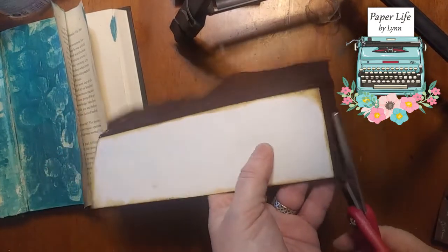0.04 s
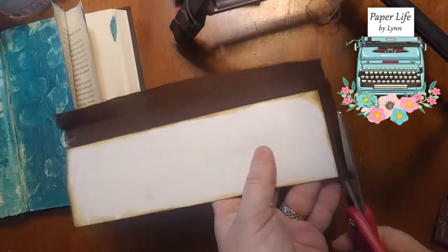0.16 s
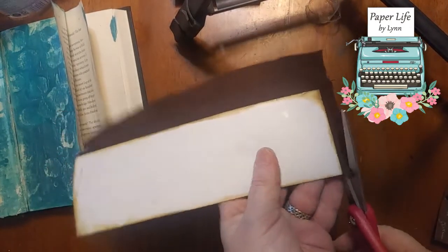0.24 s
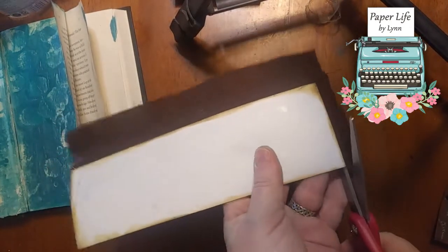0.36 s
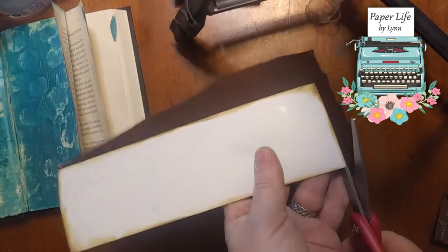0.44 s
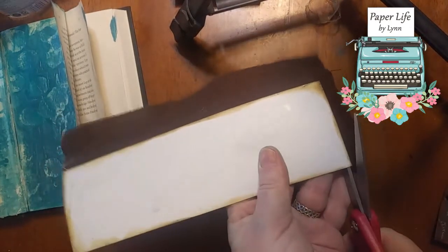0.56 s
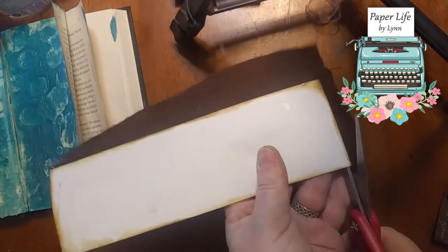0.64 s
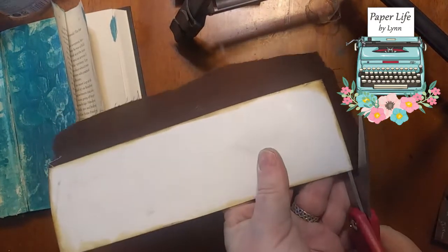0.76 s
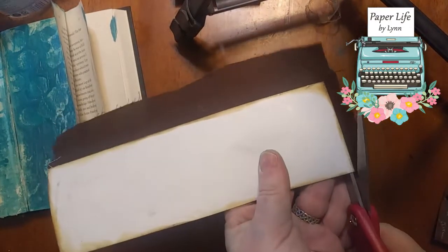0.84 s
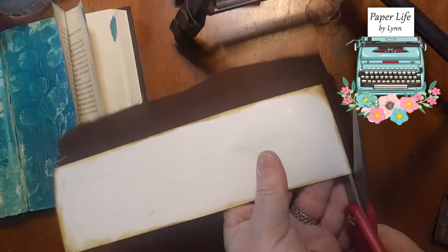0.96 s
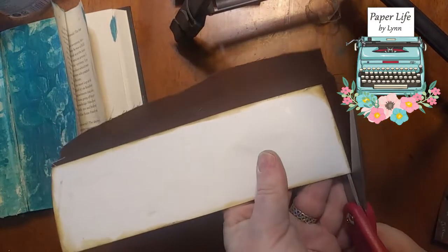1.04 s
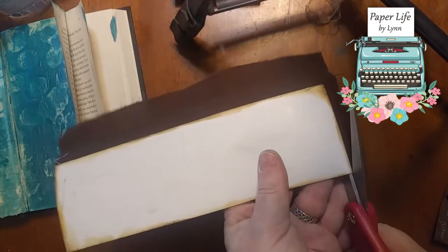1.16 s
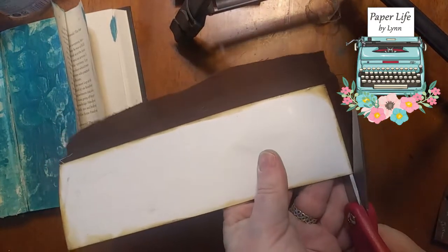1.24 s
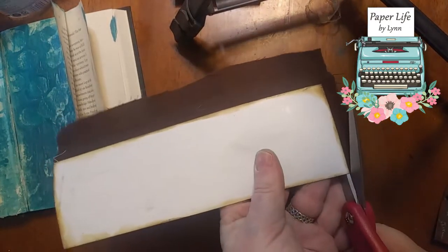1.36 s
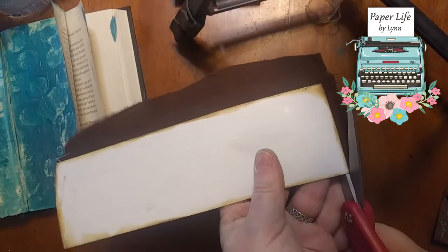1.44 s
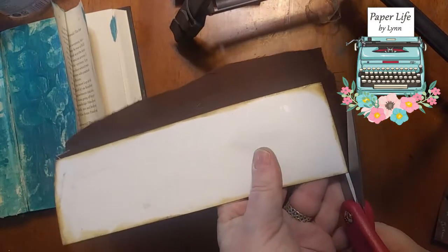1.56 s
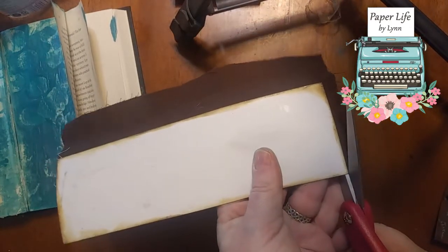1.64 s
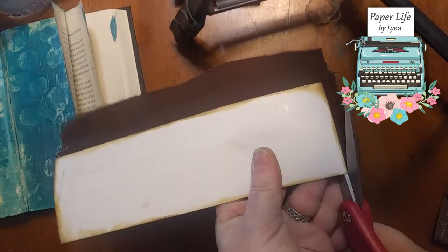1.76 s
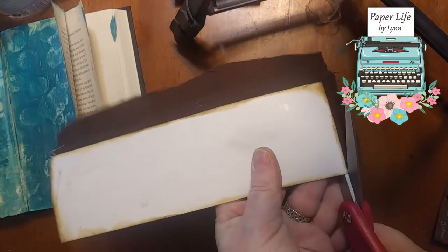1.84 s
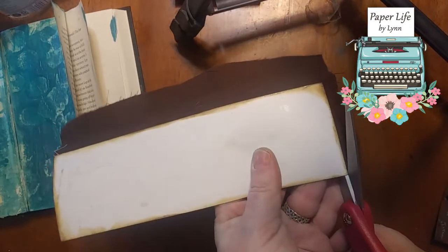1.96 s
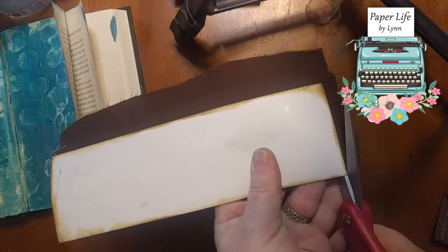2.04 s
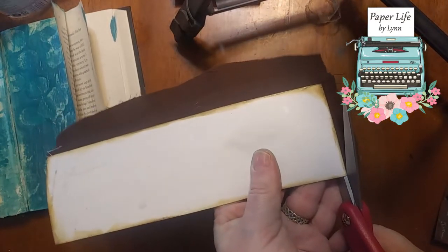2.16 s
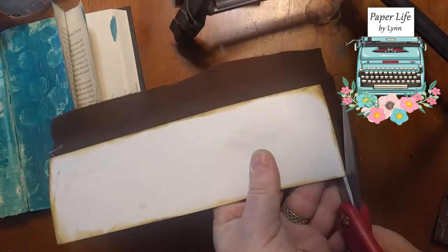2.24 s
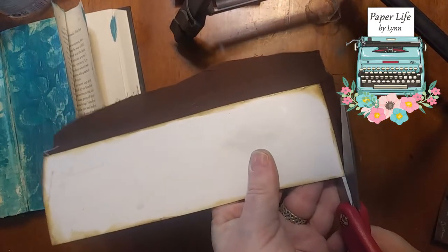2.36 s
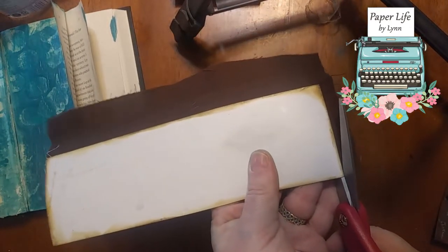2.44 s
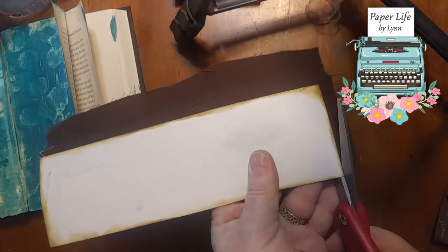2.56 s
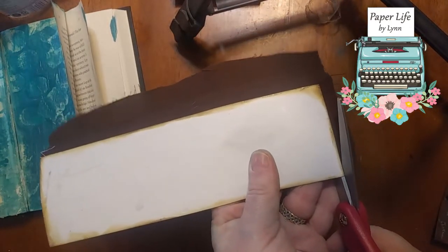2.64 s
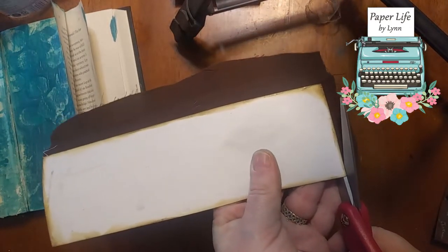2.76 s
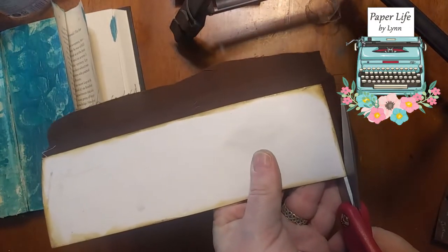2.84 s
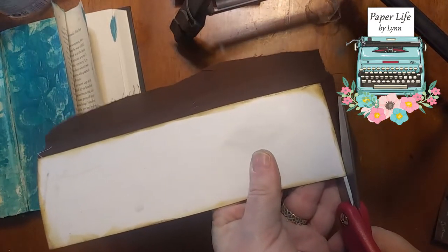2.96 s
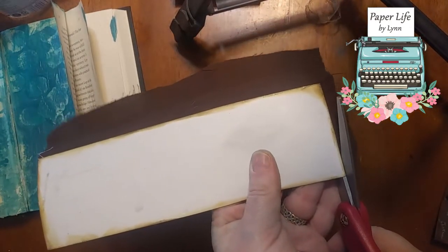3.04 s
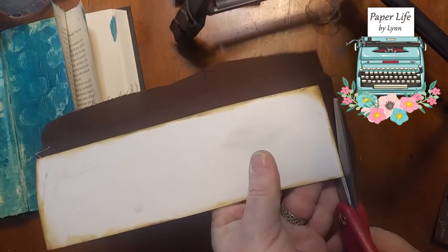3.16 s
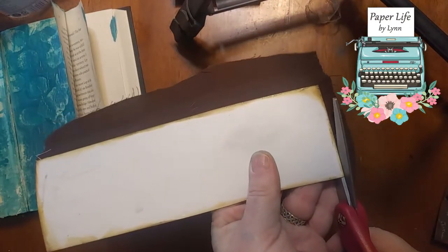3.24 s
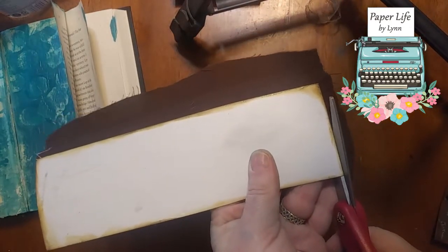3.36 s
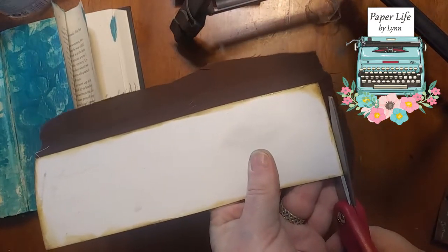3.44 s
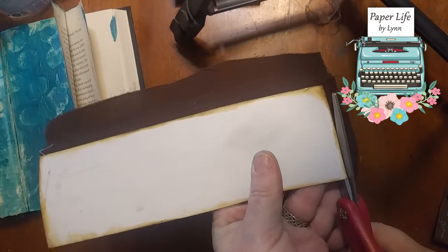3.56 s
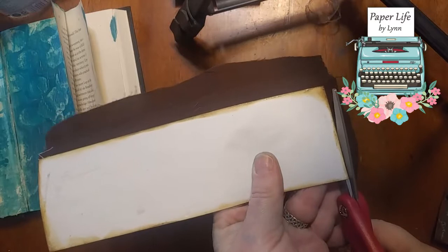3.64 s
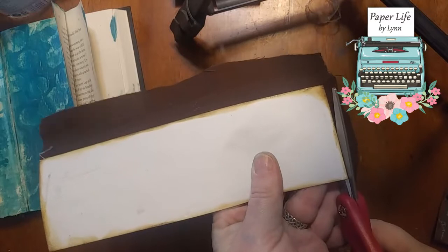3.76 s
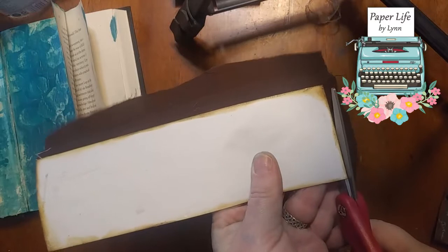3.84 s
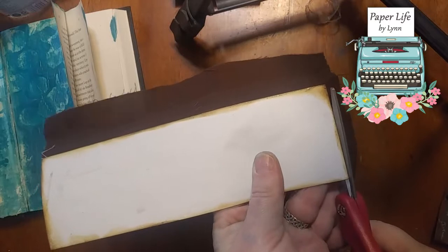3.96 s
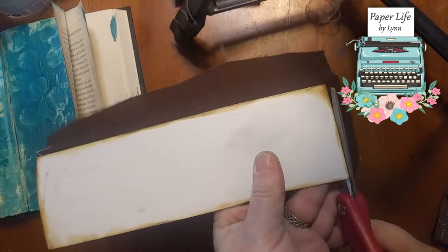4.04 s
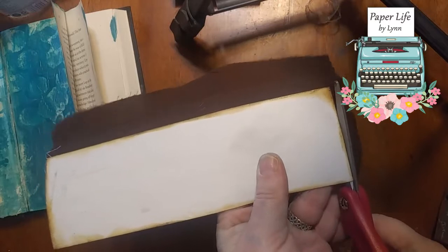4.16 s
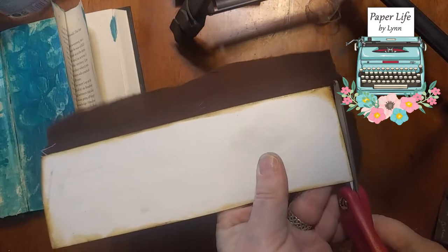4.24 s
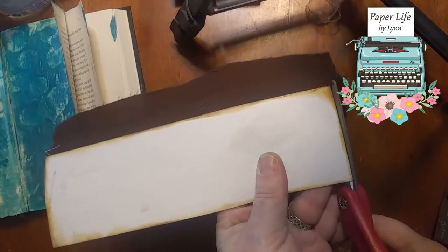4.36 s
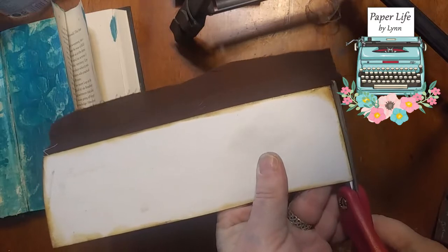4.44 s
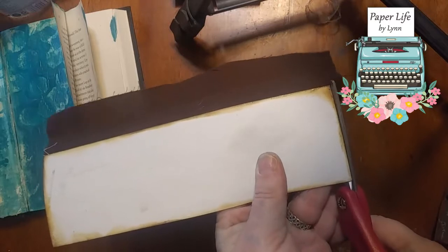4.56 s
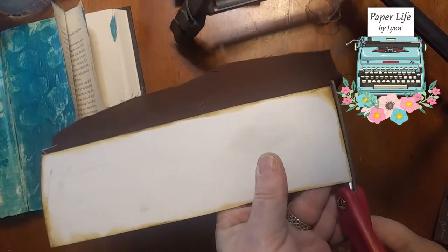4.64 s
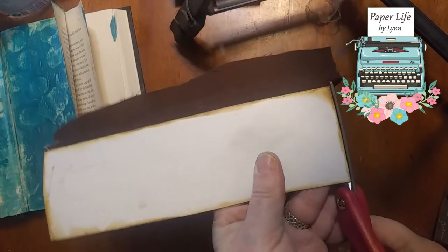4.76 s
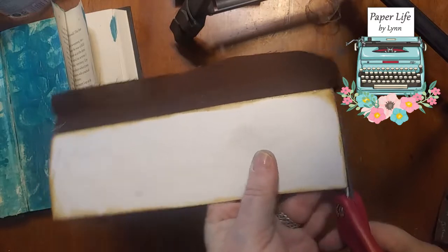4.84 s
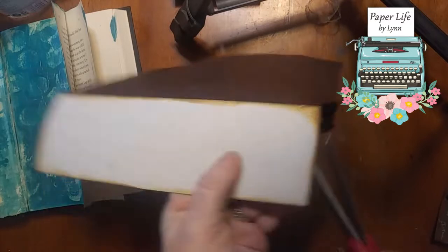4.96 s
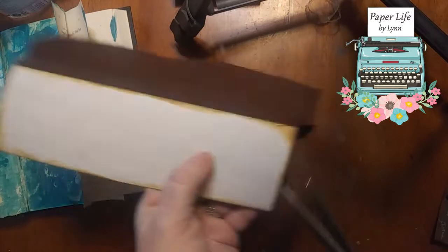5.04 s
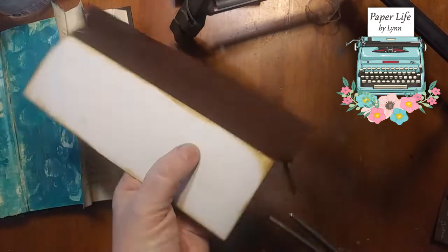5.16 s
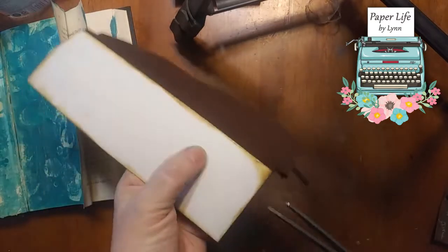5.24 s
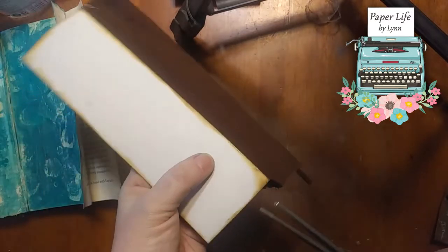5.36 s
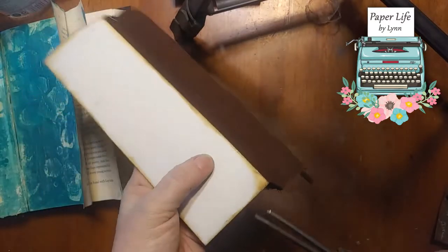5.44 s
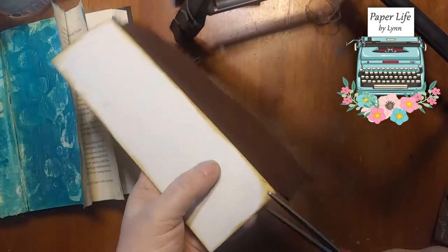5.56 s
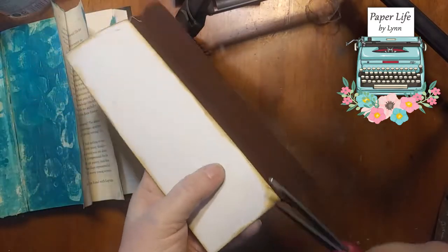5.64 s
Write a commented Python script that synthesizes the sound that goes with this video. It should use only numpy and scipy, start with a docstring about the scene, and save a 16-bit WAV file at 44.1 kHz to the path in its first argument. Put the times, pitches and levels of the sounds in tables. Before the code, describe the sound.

In a quiet room with a faint unsteady motor hum, fabric and card rustle briefly in the hand. Scissor blades then creep almost silently with tiny thin slips. Short metallic scrapes grow firmer, with clicks and pauses, until a sharp crack, a tight run of snips and a hard snap shut. A few knocks and papery rustles follow. Close microphone, small dry indoor space.

```python
"""Steel scissors trim thin fabric along a hand-held card, close by in a quiet room with a faint, steady hum.
Fabric rustles and a few slips zing; the blades creep and inch forward with faint slips and longer glides.
Then they bite in short stick-slip strokes, knock against the card, break through with a crack and snap shut.
Last come a few knocks, and fabric and card rustle as they are lifted and turned.
Friction is coloured grains, knocks are clicks ringing damped modes, the hum is sines over coloured noise."""
import sys
import numpy as np
from scipy import signal
from scipy.fft import rfft, irfft
from scipy.io import wavfile

SR = 44100
rng = np.random.default_rng(int(sys.argv[2]) if len(sys.argv) > 2 else 0)


def generate_wav(signal):
    """Clip the signal to [-1, 1] and save it as 16-bit WAV at the path in sys.argv[1]."""
    frames = np.transpose(np.atleast_2d(signal))
    scaled = np.clip(frames, -1, 1) * 32767
    pcm = np.round(scaled).astype(np.int16)
    wavfile.write(sys.argv[1], SR, pcm)


N = 251370
TIME = np.arange(N) / SR

# blades creeping between the slips, before the trim in creep(): (t/s, level/dB)
CREEP_LEVEL = [(0.42, -62), (1.13, -70.5), (2.22, -78), (2.55, -69.5), (3.08, -71.5), (3.47, -66),
               (3.66, -64.5), (3.91, -82), (4.23, -66), (4.34, -62), (4.47, -56), (4.85, -61)]


def from_db(db):
    """Decibels to gain."""
    return 10 ** (np.asarray(db) / 20)


def rms_one(x):
    """Scale to unit power."""
    return x / np.sqrt(np.mean(x ** 2) + 1e-20)


def coloured(x, spectrum):
    """Filter x by a curve drawn on a log-frequency axis; rms 1."""
    hz, db = np.transpose(spectrum)
    bins = np.maximum(np.fft.rfftfreq(N, 1 / SR), 1)
    gain = from_db(np.interp(np.log(bins), np.log(hz), db))
    return rms_one(irfft(rfft(x) * gain, N))


def drift(per_s):
    """Slow random curve of rms 1 through per_s new points a second."""
    knots = rng.standard_normal(N // 10)
    return rms_one(np.interp(TIME * per_s, np.arange(len(knots)), knots))


def grains(per_s, spread_db, clump_db, clumps_per_s):
    """Tiny friction releases of uneven size, whose strength drifts so that they clump."""
    born = rng.random(N) < per_s / SR
    size_db = spread_db * np.minimum(rng.exponential(1, N), 4) + clump_db * drift(clumps_per_s)
    return born * rng.choice([-1, 1], N) * from_db(size_db)


def ring(x, hz, t60):
    """A damped two-pole mode: a unit click sets a sine of height 1 ringing."""
    radius = from_db(-60 / (t60 * SR))
    angle = 2 * np.pi * hz / SR
    feedback = [1, -2 * radius * np.cos(angle), radius ** 2]
    return signal.lfilter([0, np.sin(angle)], feedback, x + 1e-18)


def level(rows):
    """A dB curve as a gain, silent outside its span."""
    s, db = np.transpose(rows)
    return from_db(np.interp(TIME, s, db, left=-150, right=-150))


def add(out, s, sound):
    """Mix a sound in at time s."""
    start = max(round(s * SR), 0)
    out[start:start + len(sound)] += sound[:N - start]


def motion(start, length, attack, release):
    """Gain of a hand movement: a smooth rise around its start, a hold, an exponential release."""
    rise = 0.5 + 0.5 * np.tanh(2 * (TIME - start) / attack)
    return rise * np.exp(-np.maximum(TIME - start - length, 0) / release)


def focused(x, hz, q, share):
    """Let one resonance stand out of x; rms 1."""
    resonance = signal.lfilter(*signal.iirpeak(hz, q, fs=SR), x)
    return rms_one(x + share * rms_one(resonance))


def radiated(x):
    """Such small objects radiate little bass."""
    return signal.sosfilt(signal.butter(2, 220, "high", fs=SR, output="sos"), x)


def tone(hz, wander_rad=0.2):
    """A sine of rms 1 whose phase wanders a little."""
    start_turn = rng.random()
    return np.sqrt(2) * np.sin(2 * np.pi * (hz * TIME + start_turn) + wander_rad * drift(3.03))


def background():
    """Soft air noise under slightly unsteady appliance tones, with a throbbing mains tone and a swelling motor tone."""
    # the room's steady air, relative: (f/Hz, level/dB per Hz)
    air_colour = [(18, -52), (36, -18), (62, -13.5), (105, -13), (140, -8.5), (175, -0.5), (230, -2),
                  (275, -6.5), (374, -5.5), (426, -3.5), (584, -16.5), (1010, -14), (1100, -18.5),
                  (2010, -22), (7470, -34), (9220, -35), (12000, -42), (16000, -36.5)]
    # an appliance's hum, before its waver: (f/Hz, level/dB rms)
    hum_tones = [(59.4, -77), (158.2, -67), (237.6, -67), (240.0, -65), (252.1, -66), (297.0, -61),
                 (336.1, -68), (356.4, -65.5), (360.0, -68), (415.8, -62.5), (475.2, -67), (534.6, -74),
                 (653.4, -78), (772.2, -75), (831.6, -75), (1009.8, -76), (1188.0, -77), (1960.2, -78),
                 (2376.0, -80)]
    # the strongest motor tone swells and fades: (t/s, level/dB rms)
    drone_level = [(0, -62.5), (0.4, -56.5), (0.65, -63), (1.1, -56), (1.35, -61), (1.62, -54.5),
                   (2.0, -65.5), (2.42, -53.5), (2.7, -71), (3.3, -58.5), (3.9, -55.5), (4.55, -65.5),
                   (5.15, -52), (5.5, -64), (5.7, -61)]
    air_db, waver_db = -54.5, 1.5
    mains_hz, mains_db, drone_hz = 120.0, -60, 210.8
    # the mains tone throbs slowly, as a motor's slip beats against it
    throb_depth, throb_period_s, throb_peak_s = 0.29, 0.571, 0.3

    hum = sum(from_db(db + waver_db * drift(5.4)) * tone(hz) for hz, db in hum_tones)
    throb = 1 + throb_depth * np.cos(2 * np.pi * (TIME - throb_peak_s) / throb_period_s)
    hum += from_db(mains_db) * throb * tone(mains_hz)
    hum += level(drone_level) * tone(drone_hz)
    return hum + from_db(air_db) * coloured(rng.standard_normal(N), air_colour)


def creep(trim_db=-3.0):
    """The slowly closing edges whisper against each other: dense, clumping friction grains."""
    # colour of the whisper, relative: (f/Hz, level/dB)
    creep_colour = [(500, -39), (2500, -13.5), (4200, -11), (6600, -15.5), (7700, -25), (8700, -4),
                    (9600, -5), (10700, -25), (12000, -23), (16000, -34)]
    friction = grains(per_s=9000, spread_db=2.5, clump_db=2.5, clumps_per_s=70)
    return from_db(trim_db) * level(CREEP_LEVEL) * coloured(friction, creep_colour)


def rustle(trim_db=1.5, fold_q=4, snag_share=0.38):
    """Fibres flick, each at its own pitch, with coarser snags; the bent sheet adds a resonance."""
    # colour of fabric friction, relative: (f/Hz, level/dB)
    rustle_colour = [(410, 12), (700, 6.5), (971, 5.5), (1090, -13), (1300, 7.5), (1940, -5), (3030, 1.5),
                     (3280, -1), (3550, -0.5), (6400, 1), (6830, -4.5), (9230, 9), (11800, -11.5),
                     (16000, -12)]
    # sweeps of fabric over card and fingers, before the trim:
    # (start t/s, length/s, level/dB, bent sheet f/Hz, share of that resonance)
    sweep_rows = [(0.0, 0.1, -54.5, 4000, 0.22), (0.167, 0.029, -49.5, 2000, 0.31),
                  (0.256, 0.093, -51, 1920, 0.27), (0.37, 0.034, -59, 4200, 0.19),
                  (0.5, 0.035, -60, 2200, .6), (0.872, 0.029, -64, 1900, 0.44), (1.202, 0.18, -69, 2080, 3),
                  (4.849, 0.071, -54, 3330, 0.18), (4.95, 0.081, -47.5, 3400, .25),
                  (5.068, 0.06, -52.5, 3600, .2), (5.169, 0.17, -55, 4680, 0.43),
                  (5.432, 0.095, -56.5, 3300, .2), (5.654, .035, -63.5, 4500, 0.22)]
    # a sweep swells, eases off as the hand slows, and dies away
    attack_s, sag_db_per_s, release_s = 0.014, 6, 0.024

    flicks = np.zeros(N)
    for hz in np.linspace(1000, 15000, 10):
        fibres = grains(per_s=1400, spread_db=2.8, clump_db=2.5, clumps_per_s=140)
        flicks += signal.lfilter(*signal.iirpeak(hz, hz / 1500, fs=SR), fibres)
    snags = grains(per_s=260, spread_db=2.4, clump_db=2.0, clumps_per_s=40)
    friction = coloured(rms_one(flicks) + snag_share * rms_one(snags), rustle_colour)
    out = np.zeros(N)
    for s, length, db, fold_hz, share in sweep_rows:
        sagging_db = db - sag_db_per_s * np.clip(TIME - s, 0, length)
        hand = from_db(sagging_db) * motion(s, length, attack_s, release_s)
        out += hand * focused(friction, fold_hz, fold_q, share)
    return from_db(trim_db) * out


def knocks(thump_t60=0.02):
    """A crunchy click rings the scissors, whose modes shift with how far the blades are open, and thumps the card."""
    # blades catching or meeting:
    # (t/s, ring level/dB, contact hardness f/Hz, main mode f/Hz, card thump level/dB, thump f/Hz)
    knock_rows = [(0.0742, -45, 14000, 1150, -31, 424), (0.804, -50.5, 5000, 1150, -60, 600),
                  (2.956, -33.5, 1500, 1194, -39, 520), (3.3874, -23, 950, 1150, -29.5, 587),
                  (3.437, -25.5, 1150, 1175, -32, 625), (3.9205, -39, 4000, 1230, -34, 500),
                  (3.9258, -16.5, 1000, 1225, -32.5, 500), (3.950, -30, 1300, 1230, -43, 415),
                  (3.9666, -33.5, 2500, 1230, -33, 413), (3.975, -39, 2500, 1245, -42, 448),
                  (4.288, -27.5, 6000, 1150, -49, 422), (4.2941, -18, 12000, 1150, -38, 495),
                  (4.3153, -44, 8000, 1150, -51, 513), (4.383, -45, 8000, 1150, -38, 566),
                  (4.538, -39, 9000, 1190, -43, 418), (4.647, -38.5, 4000, 1250, -32.5, 834),
                  (4.8497, -19.5, 910, 1225, -27, 545), (4.861, -29, 1800, 1260, -27.5, 428),
                  (4.938, -46, 1500, 1150, -36, 405), (4.974, -51, 1500, 1150, -30, 560),
                  (4.98, -50, 2500, 1150, -43, 630), (4.985, -37, 2000, 1150, -39, 574)]
    # modes of the scissors, damped by the hand, before the shift: (f/Hz, level/dB, t60/s)
    hand_damped_modes = [(834, -32, 0.067), (1150, -4.5, 0.032), (1430, -4.5, 0.0094), (1800, -10, 0.028),
                         (2450, -9.5, 0.028), (3250, 1, 0.0079), (3600, -0.5, 0.011), (4120, 0, 0.016),
                         (4400, 3.5, 0.0078), (5000, -24, .018), (6630, -5, .016), (6330, -11, .012),
                         (8600, -8, .013)]
    # the blades' faint after-ring, before the shift: (f/Hz, level/dB, t60/s)
    after_ring = [(1150, -30.5, 0.098), (2450, -30, 0.093), (3600, -37, 0.6), (3800, -36, 0.64),
                  (4080, -38, .1), (6300, -37, 0.19)]
    main_mode_hz, crunch_db, crunch_s = 1150, -29, 0.002

    out, t = np.zeros(N), TIME[:SR // 2]
    click = 1.0 * (t == 0)
    for s, ring_db, hard_hz, ring_hz, card_db, card_hz in knock_rows:
        crunch = from_db(crunch_db) * rng.standard_normal(len(t)) * np.exp(-t / crunch_s)
        # a softer contact passes less treble
        soft = np.exp(-2 * np.pi * hard_hz / SR)
        force = signal.lfilter([(1 - soft) ** 2], [1, -2 * soft, soft ** 2], click + crunch)
        opening = ring_hz / main_mode_hz
        steel = np.zeros(len(t))
        for k, (hz, mode_db, t60) in enumerate(hand_damped_modes + after_ring):
            steel += (-1) ** k * from_db(mode_db) * ring(force, hz * opening, t60)
        add(out, s, from_db(ring_db) * steel)
        add(out, s, from_db(card_db) * ring(click, card_hz, thump_t60))
    return radiated(out)


def snap(s, modes, contact_hz=11000, hollow_hz=8000, hollow_share=0.52):
    """One hard click rings the scissors briefly as one piece; the sound is hollow just under the zing."""
    click = 1.0 * (np.arange(N) == round(s * SR)) + 1e-18
    force = signal.sosfilt(signal.butter(3, contact_hz, fs=SR, output="sos"), click)
    force = force - hollow_share * signal.lfilter(*signal.iirpeak(hollow_hz, 6, fs=SR), force)
    return radiated(sum(from_db(db) * ring(force, hz, t60) for hz, db, t60 in modes))


def crack():
    """The blades break through a thick spot with one hard crack."""
    # modes of the crack: (f/Hz, level/dB, t60/s)
    crack_modes = [(560, -31, 0.018), (1304, -24, 0.016), (3150, -22.5, 0.0083), (3730, -17.5, 0.0083),
                   (4200, -24, .011), (7260, -29, .006), (9200, -26, .008)]
    return snap(4.2935, crack_modes)


def snap_shut():
    """The scissors close fully at the end of the cut and ring as a closed pair."""
    # modes of the closed pair: (f/Hz, level/dB, t60/s)
    shut_modes = [(356, -25.5, 0.02), (845, -35, 0.038), (1500, -33, .009), (2650, -47.5, 0.1),
                  (3000, -48, .05), (3300, -24, 0.0064), (4300, -25, 0.0068), (5050, -28, 0.0088),
                  (7000, -33, .007), (9850, -43, .08)]
    return snap(4.747, shut_modes)


def blade_pitch(s):
    """Pitch of the zing at time s in Hz: it follows how hard the blades are pressed together."""
    # steel ring: (t/s, f/Hz)
    pitch_curve = [(0.0, 8900), (0.75, 8760), (2.36, 9200), (2.48, 9650), (3.09, 9300), (3.48, 9760),
                   (3.57, 8500), (3.79, 8850), (3.89, 10300), (4.06, 8900), (4.43, 8600), (4.76, 10100),
                   (4.89, 9000), (5.7, 9260)]
    return np.interp(s, *np.transpose(pitch_curve))


def shear(strokes, clump_db, tear_share):
    """The edges grind and ring near 9 kHz while threads part, in each stroke at a pitch of their own."""
    # colours of the steel zing, the top sizzle and the tearing threads, relative: (f/Hz, level/dB)
    zing_colour = [(5500, -47), (6900, -14.5), (7900, -21.5), (8800, -5.5), (9900, 3), (10500, -10.5),
                   (11500, -37), (13000, -30), (16000, -41)]
    sizzle_colour = [(9500, -4.5), (10700, 8.5), (11300, 2), (11800, -6), (12900, 1.5), (13700, -4),
                     (14500, -10), (16000, -6)]
    thread_colour = [(80, -49), (350, 2), (520, -3.5), (720, -1.5), (1230, -3), (1900, -3.5), (2450, -5.5),
                     (2820, -7), (3300, -2.5), (3750, -2.5), (4250, -1.5), (4600, -3), (5050, -1),
                     (5850, -6), (6700, 0.5), (7700, -14), (8700, -5), (11000, -13), (16000, -30)]
    # trims on the strokes' levels, and the zing's ring against its grind
    zing_trim_db, threads_trim_db, zing_share = 0.5, -0.56, 1.0
    zing_t60, tear_q = 0.003, 9

    grinding = grains(per_s=11000, spread_db=1.5, clump_db=clump_db, clumps_per_s=540)
    steel, sizzle = coloured(grinding, zing_colour), coloured(grinding, sizzle_colour)
    tearing = grains(per_s=7000, spread_db=2.4, clump_db=clump_db, clumps_per_s=400)
    cloth = coloured(tearing, thread_colour)
    out = np.zeros(N)
    for s, part, stroke, steel_db, cloth_db, tear_hz, top_db in strokes:
        ringing = ring(steel[part], blade_pitch(s), zing_t60)
        zing = rms_one(steel[part]) + zing_share * rms_one(ringing)
        tear = focused(rms_one(cloth[part]), tear_hz, tear_q, tear_share)
        layers = [(zing, steel_db + zing_trim_db), (sizzle[part], top_db), (tear, cloth_db + threads_trim_db)]
        stroke_rms = np.sqrt(np.mean(stroke ** 2))
        for sound, db in layers:
            out[part] += from_db(db) * rms_one(sound * stroke) * stroke_rms
    return out


def glides():
    """Longer, even strokes of the blades: a fine, broad rasp."""
    # levels before the trims in shear():
    # (start t/s, length/s, steel zing level/dB, tearing threads level/dB, threads f/Hz, sizzle level/dB)
    glide_rows = [(0.5, 0.046, -58, -64, 4200, -71), (0.804, 0.017, -58.5, -63, 2000, -76),
                  (2.397, 0.064, -59, -60.5, 4400, -78), (2.572, 0.025, -57, -58, 4300, -75),
                  (2.894, 0.12, -59.5, -63.5, 5000, -69), (3.183, 0.04, -55, -62, 4300, -69),
                  (3.237, 0.054, -51.5, -58, 4500, -62), (3.3, 0.035, -45.5, -58, 6700, -56),
                  (3.395, 0.02, -45.5, -52, 7300, -49), (3.588, 0.12, -59, -60, 5300, -75),
                  (3.872, 0.08, -56, -58.5, 6900, -62), (3.963, 0.045, -63, -58, 5000, -70),
                  (4.119, 0.073, -55, -51, 3600, -76), (4.28, 0.085, -57, -53, 3900, -74)]
    attack_s, release_s = 0.04, 0.01
    strokes = []
    for s, length, *sound in glide_rows:
        envelope = motion(s, length, attack_s, release_s)
        part = np.flatnonzero(envelope > 0.01)
        strokes.append((s + length / 2, part, envelope[part], *sound))
    return shear(strokes, clump_db=2.8, tear_share=0.18)


def all_slips():
    """The sudden strokes, and the faint slips at uneven intervals while the cut inches forward."""
    # sudden slips of the blades, and one early swish of fabric (0.179 s), before the trims in shear():
    # (middle t/s, length/s, steel zing level/dB, tearing threads level/dB, threads f/Hz)
    slip_rows = [(0.077, 0.0054, -53, -45, 5200), (0.095, 0.013, -59, -55, 2000),
                 (0.179, 0.034, -47.5, -44, 4140), (0.804, 0.0043, -47.5, -49.5, 1600),
                 (0.893, 0.039, -59, -62, 2000), (0.992, 0.003, -57, -55, 5200),
                 (1.06, 0.04, -64.5, -76, 6700), (1.312, 0.018, -60, -76, 6700),
                 (2.159, 0.018, -57.5, -63.5, 6700), (2.382, 0.0096, -50.5, -51, 4300),
                 (2.515, 0.029, -51.5, -55.5, 5000), (2.551, 0.015, -48.5, -54, 6600),
                 (2.644, 0.014, -54, -57.5, 5000), (2.77, 0.025, -60, -65, 6700),
                 (2.934, 0.018, -47, -50, 4100), (2.959, 0.011, -38.5, -44, 6500),
                 (3.23, 0.01, -42, -53.5, 4400), (3.247, 0.01, -43, -60, 4400),
                 (3.312, 0.017, -51, -51, 6500), (3.383, 0.015, -38.5, -54.5, 5050),
                 (3.438, 0.011, -43, -56, 7100), (3.908, 0.011, -42.5, -53, 1200),
                 (3.927, 0.017, -41.5, -41.5, 2470), (3.95, 0.013, -44, -38.5, 1280),
                 (3.969, 0.012, -51, -47, 6700), (4.013, 0.008, -60, -53, 5000),
                 (4.2905, 0.0054, -35.5, -31.5, 4170), (4.295, 0.0035, -33, -25, 4300),
                 (4.304, .012, -51, -42, 4300), (4.3155, .003, -52, -46, 4100),
                 (4.326, 0.0065, -54, -46, 4160), (4.339, 0.012, -56, -43, 4300),
                 (4.384, 0.0082, -41, -38, 5000), (4.399, .022, -63, -53.5, 3400),
                 (4.4234, 0.0081, -40, -41, 5350), (4.442, .006, -53, -52, 3200),
                 (4.455, .003, -51, -58, 6800), (4.467, 0.0043, -43, -49, 6820),
                 (4.4842, 0.0083, -36.5, -39.5, 3840), (4.491, 0.0042, -44, -47, 6840),
                 (4.531, 0.0058, -44, -50, 4970), (4.5395, 0.0064, -33.5, -38.5, 4940),
                 (4.567, 0.0078, -45, -50, 4890), (4.577, .003, -50, -55, 6800),
                 (4.643, 0.011, -35, -34.5, 6950), (4.6483, 0.0064, -32, -38, 5200),
                 (4.668, 0.0067, -42, -45, 7100), (4.7468, 0.0022, -24.5, -32, 7000),
                 (4.851, 0.0073, -59, -52, 6300), (4.863, 0.0084, -49, -47, 6300),
                 (4.896, 0.006, -41.5, -48, 4500), (4.908, .006, -48, -53, 5000),
                 (4.946, 0.019, -45.5, -63, 5000), (5.268, .007, -62, -54, 6900),
                 (5.335, 0.024, -49.5, -48.5, 4700)]
    # inching cut: (start t/s, end t/s)
    inching_span = (0.6, 2.85)
    # jitter is in slip intervals; threads are relative to the zing
    slips_per_s, jitter, length_s = 14, 0.6, 0.016
    over_creep_db, spread_db, threads_db, threads_hz = 4.5, 2.5, -24, 6770

    chance = rng.standard_normal(size=(60, 2))
    times = inching_span[0] + (np.arange(len(chance)) + jitter * chance[:, 0]) / slips_per_s
    creep_db = np.interp(times, *np.transpose(CREEP_LEVEL))
    levels = creep_db + over_creep_db + spread_db * chance[:, 1]
    inching = [(s, length_s, db, db + threads_db, threads_hz)
               for s, db in zip(times, levels) if s < inching_span[1]]
    return slip_rows + inching


def slips(half_width=0.53, squareness=2.27):
    """Short, rough strokes: each gathers speed and is slowed by the cloth; firm ones sizzle."""
    # level and pitch of the zing when the blades are firmly pressed together
    firm_zing_db, pressed_hz = -41.5, 9470
    # sizzle against a firm zing at that pitch, its growth with pitch, its loss per dB of weaker zing
    sizzle_db, sizzle_db_per_khz, sizzle_db_per_db = -6, 10.5, 2.3
    # the briefest slips sound duller: less top sizzle the shorter the stroke
    brief_s = 0.0069

    strokes = []
    for s, length, steel_db, cloth_db, tear_hz in all_slips():
        part = np.flatnonzero(np.abs(TIME - s) < 1.5 * length)
        envelope = np.exp(-np.abs((TIME[part] - s) / (length * half_width)) ** squareness)
        pressed_khz = (blade_pitch(s) - pressed_hz) / 1000
        weakness_db = max(firm_zing_db - steel_db, 0)
        top_db = steel_db + sizzle_db + sizzle_db_per_khz * pressed_khz - sizzle_db_per_db * weakness_db
        brevity_db = 20 * np.log10(1 - np.exp(-envelope.sum() / SR / brief_s))
        strokes.append((s, part, envelope, steel_db, cloth_db, tear_hz, top_db + brevity_db))
    return shear(strokes, clump_db=2.0, tear_share=0.7)


def room(x):
    """Quick scatter from the desk and a fainter, duller tail, both as decaying noise echoes."""
    desk_db, desk_t60, tail_db, tail_t60, wall_hz = -13, 0.084, -18, 0.26, 5000
    t = TIME[:SR // 2]
    decay = from_db(-60 * t / [[desk_t60], [tail_t60]])
    # echoes start 2 ms after the direct sound
    desk, tail = rng.standard_normal((2, len(t))) * (t > 0.002) * decay
    tail = signal.sosfilt(signal.butter(1, wall_hz, fs=SR, output="sos"), tail)
    echoes = from_db(desk_db) * desk / np.linalg.norm(desk)
    echoes += from_db(tail_db) * tail / np.linalg.norm(tail)
    return x + signal.fftconvolve(x, echoes)[:N]


def scene():
    """Scissors and fabric above the desk, over the room's hum."""
    cutting = slips() + glides() + creep()
    blows = knocks() + crack() + snap_shut()
    return (room(cutting + blows + rustle()) + background())[None]


def record(dry):
    """Roll off the deep bass below 48 Hz and cut the top steeply at 15.9 kHz."""
    thin = signal.sosfilt(signal.butter(4, 48, "high", fs=SR, output="sos"), dry)
    return signal.sosfilt(signal.ellip(12, 0.1, 80, 15900, fs=SR, output="sos"), thin)


dry = scene()
out = record(dry)
generate_wav(out)
```